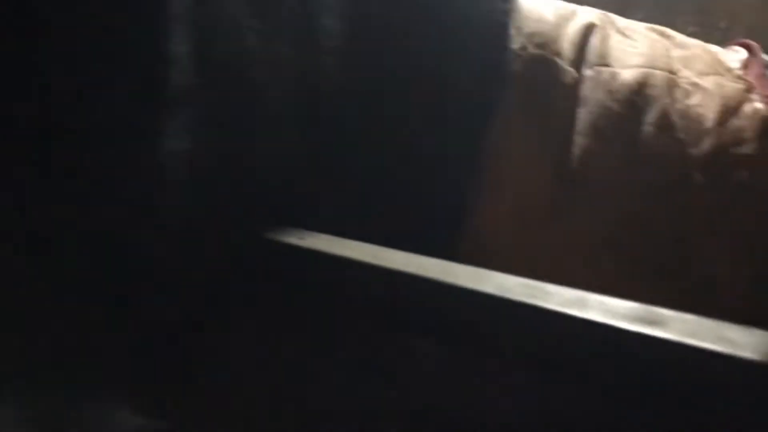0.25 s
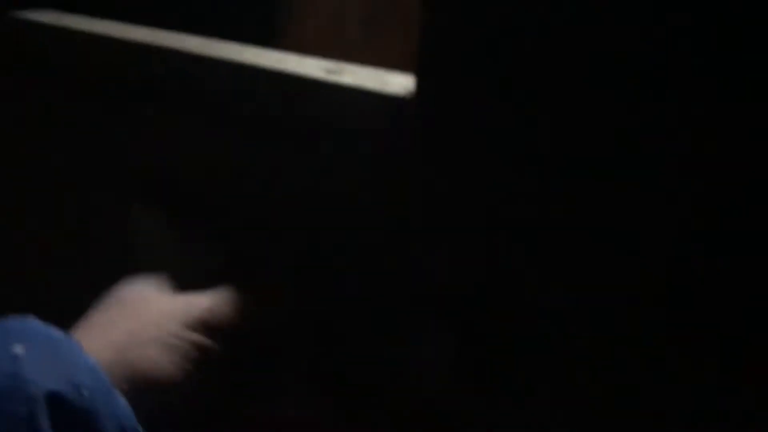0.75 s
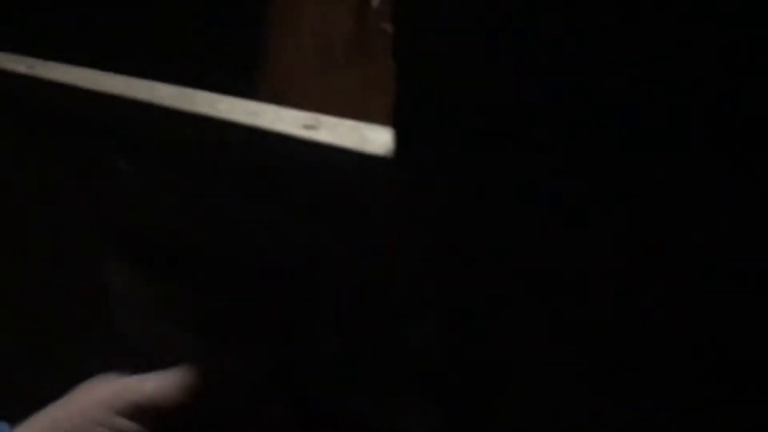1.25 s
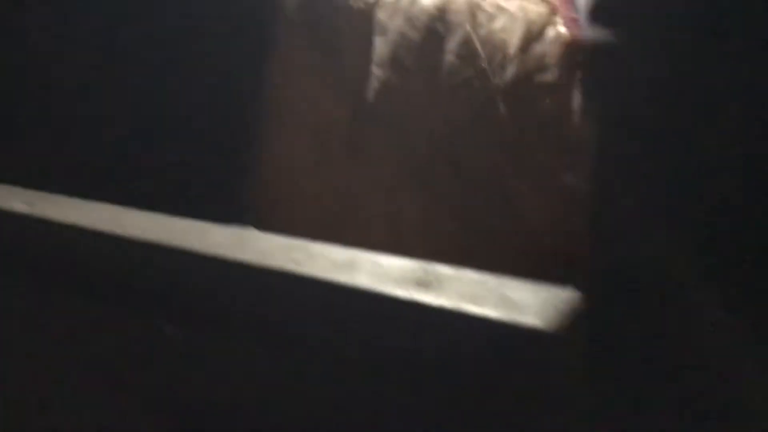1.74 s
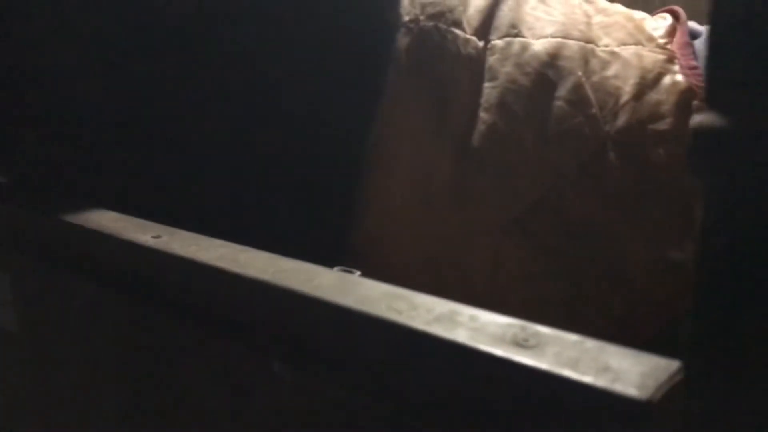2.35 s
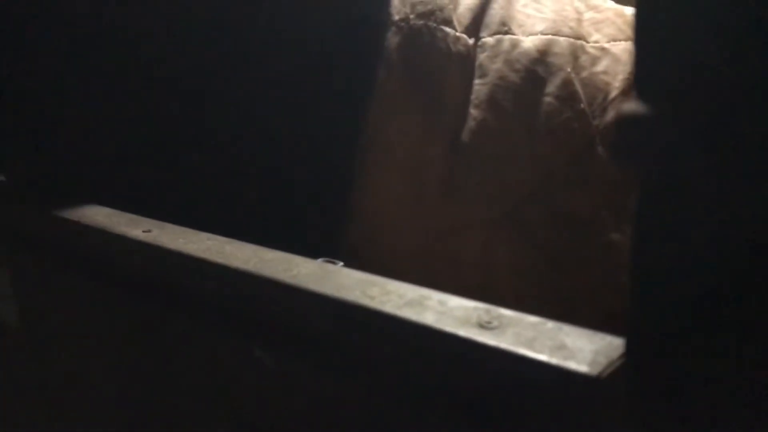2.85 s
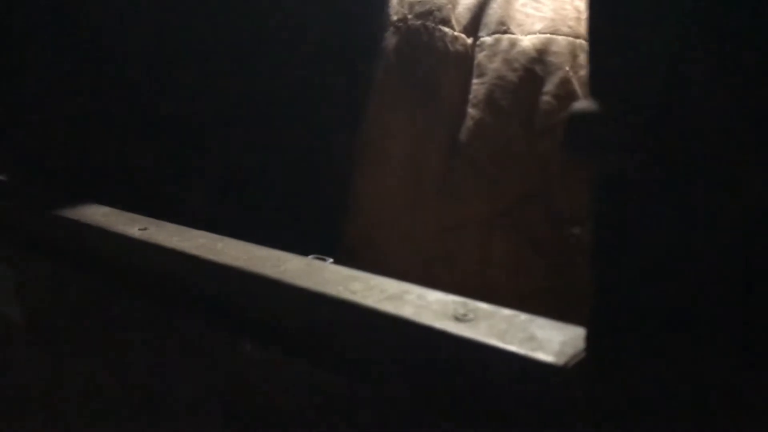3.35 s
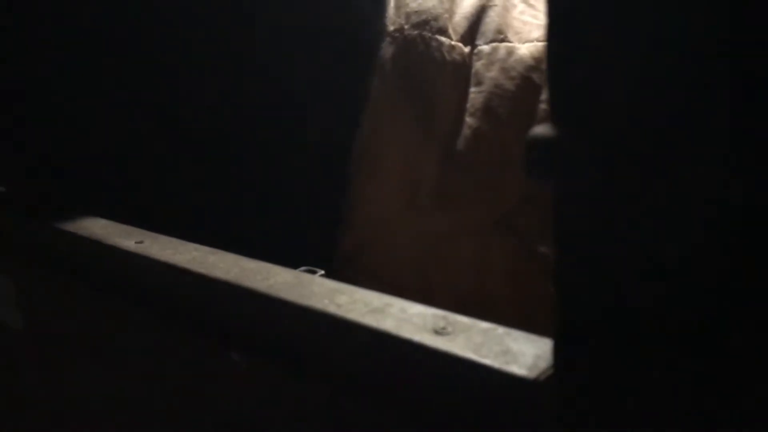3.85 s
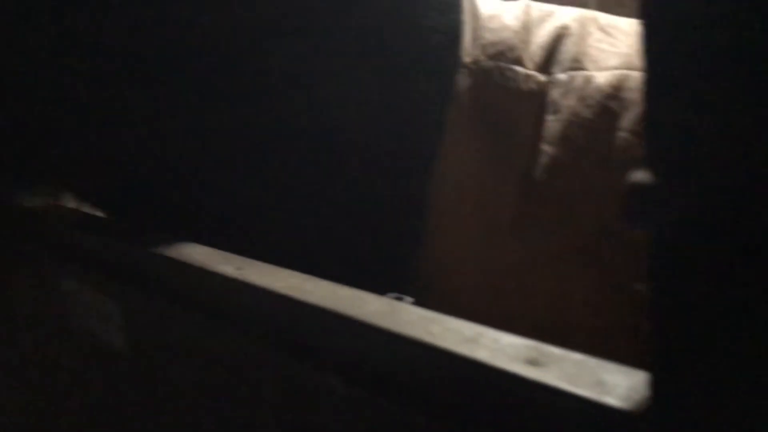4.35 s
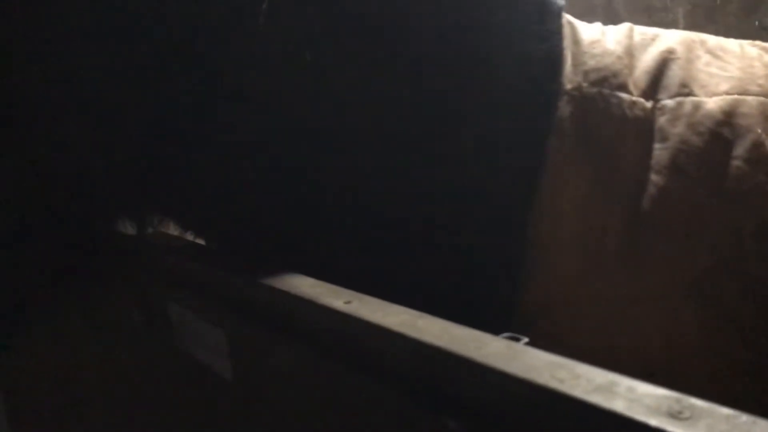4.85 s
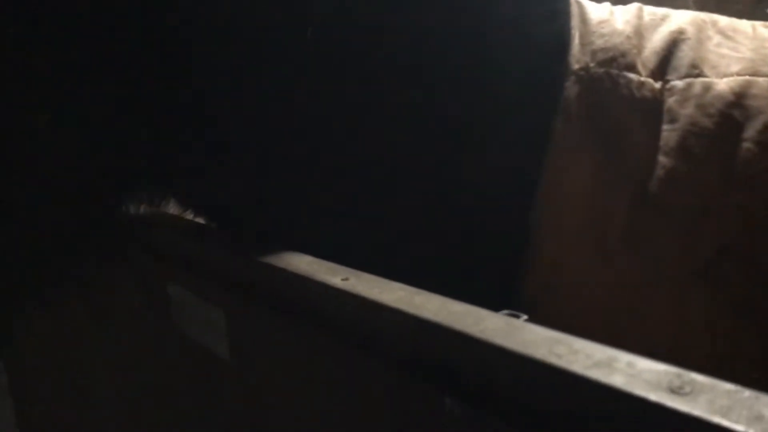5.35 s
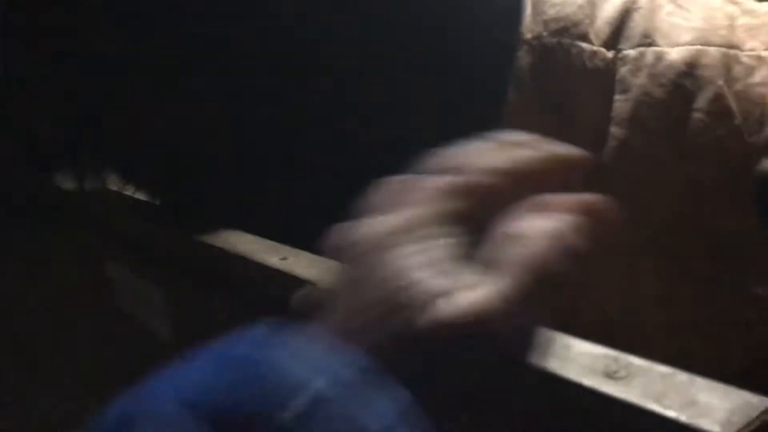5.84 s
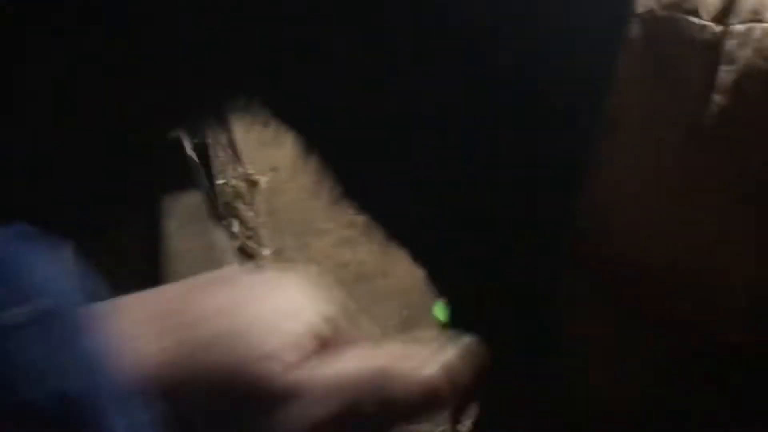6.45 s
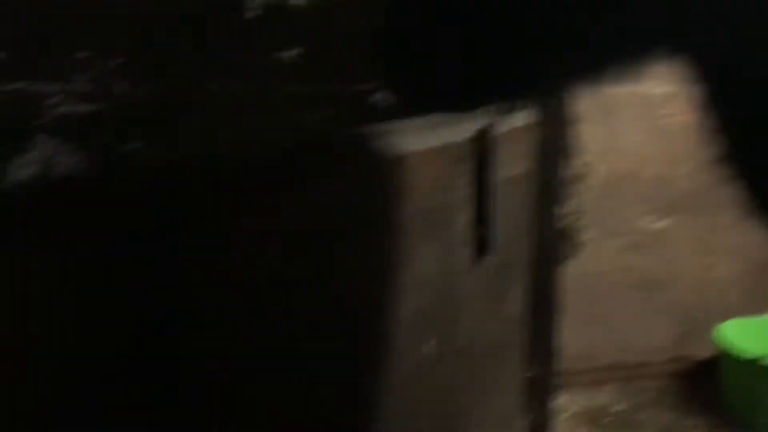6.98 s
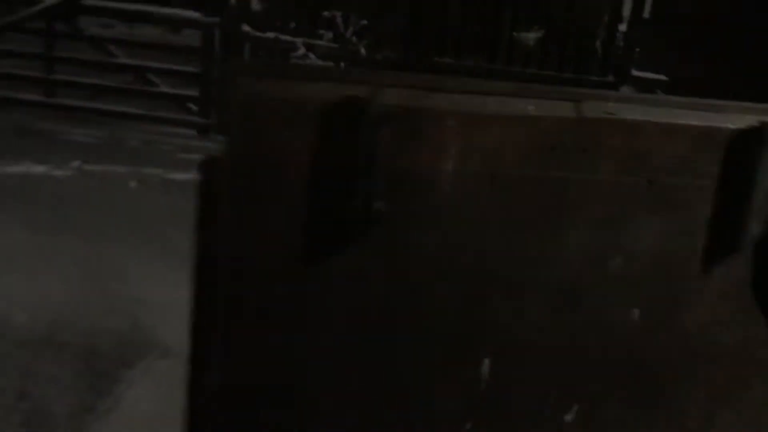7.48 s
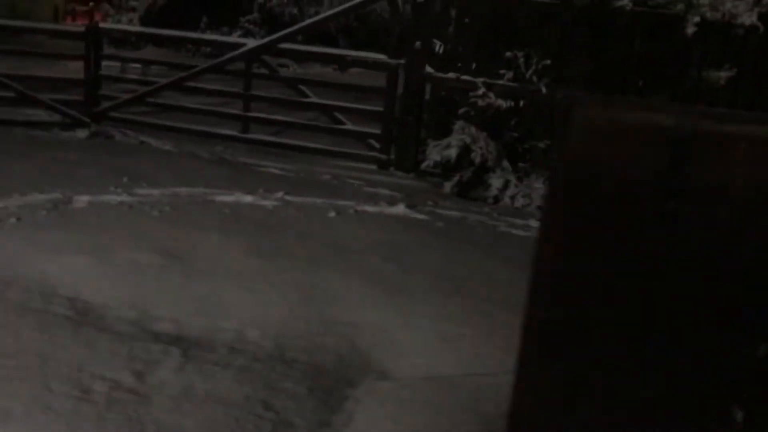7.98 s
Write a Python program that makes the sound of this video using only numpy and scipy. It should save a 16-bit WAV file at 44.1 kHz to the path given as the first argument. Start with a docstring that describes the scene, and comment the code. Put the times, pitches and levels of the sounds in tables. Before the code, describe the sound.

A steel bolt on a wooden stable half-door clacks, chatters and pings close up, boards booming behind, then scrapes and rustles as things quieten.

```python
"""The steel bolt of a wooden stable half-door, worked by hand close to a phone: it clacks, chatters and pings.
Each knock rings a bank of decaying steel modes with a crack and a rattle; the boards boom behind it as lower modes.
Shoves on the door feed grains into the boards for a judder and a deep thrum; the phone takes two soft bumps.
Filtered grit scrapes and rustles like steel, cloth and shoes; a short brick tail and a faint night hush
surround it all."""
import sys
import numpy as np
from scipy import signal
from scipy.fft import rfft, irfft
from scipy.io import wavfile
from scipy.ndimage import uniform_filter1d

SR = 44100
rng = np.random.default_rng(int(sys.argv[2]) if len(sys.argv) > 2 else 0)


def digitize_waveform(pressure):
    """Quantize a signal to 16-bit integers and store it at the path in sys.argv[1].

    Rows of a 2-D input are taken as channels; values are limited to [-1, 1].
    """
    field = np.atleast_2d(pressure).T
    bounded = np.clip(field, -1, 1)
    quanta = np.round(bounded * 32767).astype(np.int16)
    wavfile.write(sys.argv[1], SR, quanta)


N = 362254  # length in samples


def undb(db):
    """Gain of a dB value."""
    return 10 ** (np.asarray(db) / 20)


def fade(t, t60):
    """Amplitude that falls 60 dB in t60 seconds."""
    return np.exp(-np.log(1000) * t / t60)


def band(x, lo_hz, hi_hz):
    """Band-pass."""
    return signal.sosfilt(signal.butter(3, [lo_hz, hi_hz], "band", fs=SR, output="sos"), x)


def level(x, db):
    """Scale to an rms level."""
    return x * undb(db) / np.sqrt(np.mean(x ** 2))


def curves(table):
    """Columns of a table, after its times, as per-sample curves."""
    s, *columns = np.transpose(table)
    return [np.interp(np.arange(N) / SR, s, c) for c in columns]


def add(out, s, x):
    """Mix a sound in at time s."""
    i = int(s * SR)
    out[i:i + len(x)] += x[:N - i]


def walk(rate):
    """Random levels, slewed from one to the next at rate per second; spread near 1."""
    k = int(SR / rate)
    steps = np.repeat(rng.standard_normal(N // k + 1), k)
    return 1.2 * uniform_filter1d(steps, k)[:N]


def grit(rate, spread_db):
    """Tiny clicks of very uneven size, rate per second on average."""
    clicks = rng.random(N) < rate / SR
    return clicks * rng.standard_normal(N) * undb(spread_db * rng.exponential(size=N))


def ring(modes, push):
    """A force signal rings a table of modes."""
    t = np.arange(SR) / SR
    response = sum(undb(db) * fade(t, t60) * np.sin(2 * np.pi * hz * t) for hz, db, t60 in modes)
    return signal.fftconvolve(push, response)[:N]


# spectrum of the night air: [f/Hz, relative level/dB per Hz]
HUSH_SPECTRUM = [(15, -32), (25, -10), (223, 6), (607, -5.5), (796, -5), (1940, -14), (6050, -23),
                 (10400, -27.5), (14800, -28), (16000, -31.5)]
HUSH_DB = -64  # overall rms


def hush():
    """Faint steady air and microphone noise: white noise shaped by a spectrum."""
    hz, db = np.transpose(HUSH_SPECTRUM)
    f = np.arange(1, N // 2 + 2) * SR / N
    shape = undb(np.interp(np.log(f), np.log(hz), db))
    return level(irfft(rfft(rng.standard_normal(N)) * shape, N), HUSH_DB)


# bed of rubbing between knocks: [t/s, scrape level/dB, rustle level/dB]
RUB_BED = [(0.0, -48, -76), (0.16, -66, -68), (0.8, -55, -71.5), (1.05, -68, -70.5), (1.69, -59, -62),
           (2.45, -73.5, -77), (3.41, -69.5, -76.5), (4.25, -68.5, -70.5), (4.5, -64, -84.5),
           (4.71, -82.5, -76.5), (5.28, -74.5, -76.5), (5.44, -55.5, -67), (6.17, -65, -67.5),
           (7.13, -60, -76), (7.39, -66.5, -74.5), (8.21, -66, -75.5)]
# short drags and swishes on top: [t/s, length/s, scrape level/dB, rustle level/dB]
SWISHES = [(0.484, 0.23, -69, -96), (1.201, 0.12, -65.5, -73), (1.38, 0.3, -69, -79),
           (2.021, 0.15, -64, -80), (2.145, 0.026, -72, -61), (2.565, 0.26, -62.5, -67.5),
           (3.196, 0.11, -42.5, -56.5), (4.29, 0.068, -58.5, -63), (4.375, 0.059, -46.5, -66),
           (4.534, 0.088, -58.5, -88), (5.233, 0.29, -48, -62.5), (5.821, 0.17, -61.5, -74.5),
           (6.034, 0.19, -55, -75), (6.284, 0.031, -72.5, -74), (6.405, 0.15, -68.5, -92),
           (6.683, 0.077, -57.5, -57.5), (6.893, 0.018, -74, -79), (7.077, 0.086, -49.5, -56),
           (7.633, 0.12, -60, -64), (7.722, 0.11, -56, -75), (8.103, 0.18, -47, -51.5)]


def rubbing():
    """Steel scrapes in its guides as grit rings the bolt; cloth and shoes rustle in fine grains."""
    scrape_gain, rustle_gain = (undb(c) for c in curves(RUB_BED))
    t = np.arange(SR // 2) / SR
    for s, length, scrape_db, rustle_db in SWISHES:
        # quick rise, a plateau, then a tail that lingers longer in the rustle
        rise = np.clip(t / (0.18 * length), 0, 1)
        late = np.clip(t - .6 * length, 0, None)
        add(scrape_gain, s, undb(scrape_db) * rise * fade(late, 0.091))
        add(rustle_gain, s, undb(rustle_db) * rise * fade(late, 0.28))
    low, high, fine = grit(6000, 1.7), grit(9000, 1.7), grit(14000, 1.8)
    dull = level(band(low, 350, 1600), -5) + level(ring(BOLT_MODES[:5], low), -10)
    dull *= undb(1.5 * walk(30))
    keen = level(band(high, 1400, 5000), -5.5) + level(ring(BOLT_MODES[5:10], high), -20.5)
    keen *= undb(0.48 * walk(30))
    rustle = level(band(fine, 4900, .45 * SR), 0) * undb(1.3 * walk(40))
    ticks = level(band(grit(150, 0.74), 700, 2600), -8.5)  # sparser grains that catch
    return (dull + keen + ticks) * scrape_gain + rustle * rustle_gain


# the hand pushes or shakes the door: [t/s, hold/s, deep thrum level/dB, boards level/dB]
SHOVES = [(0.001, 0.023, -51, -49.5), (.29, .06, -49.5, -58), (.42, 0.033, -46, -44.5),
          (0.619, 0.14, -39.5, -42.5), (0.818, .08, -52, -42), (0.937, 0.015, -55, -53),
          (1.66, .3, -62.5, -52), (2.266, 0.025, -43, -48), (2.627, 0.1, -58, -44),
          (2.973, 0.036, -42.5, -40.5), (3.203, 0.032, -50, -42.5), (3.433, .15, -51, -50.5),
          (3.795, 0.048, -42.5, -44), (4.369, .04, -56, -32.5), (4.5, .12, -48, -68),
          (5.28, 0.22, -50.5, -52), (5.916, 0.062, -57, -51), (6.342, 0.18, -38, -44),
          (6.558, 0.039, -36, -47.5), (6.723, .05, -53, -63), (6.888, .02, -53.5, -48.5),
          (7.065, 0.021, -71, -49.5)]
PUSH_S, REST_DB = .04, -70.5  # rise of a push, door at rest
DEEP_T60_S, JUDDER_T60_S = 0.68, .45  # how thrum and boards settle


def pushes():
    """Gains of thrum and boards: each push rises, holds and settles."""
    t, gains = np.arange(SR) / SR, np.full((2, N), undb(REST_DB))
    for s, hold, deep_db, boards_db in SHOVES:
        rise = np.clip(t / PUSH_S, 0, 1) ** 2
        late = np.clip(t - PUSH_S - hold, 0, None)
        add(gains[0], s, undb(deep_db) * rise * fade(late, DEEP_T60_S))
        add(gains[1], s, undb(boards_db) * rise * fade(late, JUDDER_T60_S))
    return gains


def judder():
    """Grains of force shake the boards under the hand; the lowest mode and low noise make the thrum."""
    deep_gain, boards_gain = pushes()
    shake = band(grit(380, 3.4), 40, 480)
    # a hand on the door damps the boards
    held = [(hz, db, 0.23 * t60) for hz, db, t60 in BOARD_MODES]
    boards = level(ring(held[1:], shake), 0) * undb(0.58 * walk(21))
    rumble = level(band(rng.standard_normal(N), 45, 100), -6.5)
    thrum = rumble + level(ring(held[:1], shake), -4.8)
    return boards * boards_gain + thrum * deep_gain


# bolt knocks: [t/s, steel level/dB, steel top edge level/dB, boom of the boards level/dB]
KNOCKS = [(0.0387, -7.5, -40.5, -47.5), (0.1536, -39, -47, -66), (0.3114, -13.5, -54.5, -48.5),
          (0.3885, -49, -65, -48), (0.4442, -26.5, -75, -43), (0.622, -35.5, -40.5, -63),
          (0.6821, -30.5, -83, -41), (0.7585, -4.5, -52, -52.5), (0.7834, -32, -50, -35.5),
          (0.8766, -4, -31, -45.5), (1.2065, -35.5, -45, -91), (1.3503, -32.5, -90, -96),
          (1.6775, -7.5, -20.5, -42.5), (1.7732, -11.5, -51, -52), (1.7833, -14, -29.5, -41),
          (2.2545, -31, -63, -57.5), (2.2971, -39.5, -77, -51.5), (2.4418, -40.5, -73, -70),
          (2.605, 1, -32, -44.5), (2.6774, -12.5, -47, -50), (2.6835, -2.5, -29.5, -37.5),
          (2.699, -16.5, -32.5, -35), (2.9772, -28.5, -43, -56.5), (2.9946, -15.5, -73.5, -38),
          (3.068, -44.5, -54.5, -70), (3.183, -38, -67.5, -49), (3.1992, -15, -52, -38),
          (3.2296, -8, -45.5, -36), (3.262, -21, -83, -39), (3.2877, -24, -88, -39),
          (3.309, -32, -56.5, -45), (3.323, -33, -67, -46), (3.434, -20, -62, -37),
          (3.5575, -41.5, -54.5, -80), (3.5754, -34, -68.5, -58.5), (3.5803, 2, -38.5, -55.5),
          (3.8194, -26.5, -75, -44), (3.8428, -2, -39.5, -44.5), (4.3295, -30.5, -42, -40),
          (4.408, -21.5, -45, -35), (4.4222, -27.5, -71, -29), (4.5112, -7, -40.5, -56),
          (4.6794, -33, -50.5, -63.5), (5.2724, -10, -28.5, -40.5), (5.367, -33.5, -66.5, -67),
          (5.3869, -11.5, -39, -41.5), (5.4058, -8, -32.5, -38.5), (5.4154, 4, -11.5, -27),
          (5.6396, -31.5, -60, -60), (5.6634, -33.5, -42, -59.5), (6.0251, -24.5, -53.5, -47),
          (6.3094, -34.5, -73, -68.5), (7.557, -40, -76.5, -88), (7.903, -46.5, -81, -66)]
# the bolt held in its guides: [f/Hz, relative level/dB, t60/s]
BOLT_MODES = [(675.7, -5, 0.038), (958, -3.5, 0.05), (1034, -2.5, 0.064), (1245.4, 3, 0.023),
              (1410, -2, 0.026), (1876, -3, 0.033), (2133, -5.5, .02), (2837, -2, 0.026),
              (3867, 0.5, 0.024), (4540, -14.5, 0.0083), (5580, 5, 0.011), (5870, -6.5, 0.019),
              (6200, -2, 0.012), (7590, -11, 0.045), (8450, -10, 0.043), (9790, -1, .03),
              (12030, 7.5, 0.014), (14000, -6, 0.014), (14400, -3.5, 0.0092)]
# centres of clank, steel, bright band and top edge: [f/Hz]
COLOUR_HZ = [1100, 3000, 5600, 11000]
# low clank, grows with steel and boards: [level/dB, slope on steel/dB per dB, slope on boards/dB per dB]
CLANK = (12.76, .38, 0.53)
# bright band, grows with steel and top edge: [level/dB, slope on steel/dB per dB, slope on top edge/dB per dB]
BRIGHT = (5.1, .75, 0.43)
CLANK_TOP_DB, BRIGHT_TOP_DB = -12, -6  # neither gets louder than this
CHATTER_S, CHATTER_DB_PER_DB = 0.0021, 0.14  # decay at a 0 dB blow; weaker blows chatter longer


def bolt():
    """Each knock rings the bolt through a short chatter of rebounds, with a dry crack and a duller after-rattle."""
    out, cracks, t = np.zeros(N), np.zeros(N), np.arange(6000) / SR
    hz, mode_db, t60 = np.transpose(BOLT_MODES)[:, :, None]
    f = np.arange(1, len(t) // 2 + 2) * SR / len(t)
    for s, steel_db, top_db, boards_db in KNOCKS:
        clank_db = min(np.dot(CLANK, [1, steel_db, boards_db]), CLANK_TOP_DB)
        bright_db = min(np.dot(BRIGHT, [1, steel_db, top_db]), BRIGHT_TOP_DB)
        colour = np.array([clank_db, steel_db, bright_db, top_db])
        # every blow lands elsewhere, so the balance of modes changes; weak ones hardly ring
        luck = rng.standard_normal((2, len(BOLT_MODES), 1))
        mode_colour = np.interp(np.log(hz), np.log(COLOUR_HZ), colour)
        gain = undb(mode_db + mode_colour + 2.4 * luck[0] - 11 + 0.11 * steel_db)
        swell = np.clip(t * hz / 1.7, 0, 1)  # a mode needs a cycle or so to build up
        waves = np.sin(2 * np.pi * hz * np.exp(0.018 * luck[1]) * t)
        tone = np.sum(gain * swell * fade(t, t60) * waves, axis=0)

        chatter = CHATTER_S * undb(-CHATTER_DB_PER_DB * steel_db)
        die = np.exp(-t / np.clip(chatter, .0005, .05))
        hits = rng.random(len(t)) < 2200 / SR
        rebounds = .7 * die * hits * rng.uniform(-1.1, 1, len(t))
        rebounds[0] = 1  # the blow itself
        ringing = signal.fftconvolve(tone, rebounds)[:len(t)]

        shape = undb(np.interp(np.log(f), np.log(COLOUR_HZ), colour)) / (1 + (600 / f) ** 3)
        hiss = rfft(rng.standard_normal((2, len(t)))) * shape
        crack = irfft(hiss[0], len(t)) * die
        rattle_fade = np.clip(t / 0.0038, 0, 1) * (fade(t, 0.073) + 0.065 * fade(t, 0.29))
        rattle = irfft(hiss[1] / (1 + f / 2500), len(t)) * rattle_fade
        soft = np.clip(t / (.0003 * undb(-.7 * steel_db)), 0, 1)  # weak blows press longer
        add(out, s, soft * (ringing + undb(1.5) * crack) + undb(-11.5) * rattle)
        add(cracks, s, soft * crack)
    return out, cracks


# door boards, free to ring: [f/Hz, relative level/dB, t60/s]
BOARD_MODES = [(64.8, -10, 0.99), (135, -2.5, 0.38), (175.5, -3.5, 0.33), (212.4, -1, 0.37),
               (273.5, -9, 0.3), (349.1, -1.5, 0.22), (381, -12.5, 0.022), (549, -3, 0.04),
               (653, -1, 0.023)]


def boom():
    """Each knock reaches the boards as a smeared blow and rings their modes."""
    out, t = np.zeros(N), np.arange(SR // 2) / SR
    hz, mode_db, t60 = np.transpose(BOARD_MODES)[:, :, None]
    for s, *_, boards_db in KNOCKS:
        luck = rng.standard_normal((2, len(BOARD_MODES), 1))
        waves = np.sin(2 * np.pi * hz * np.exp(0.024 * luck[1]) * t)
        tone = np.sum(undb(mode_db + 2.8 * luck[0]) * fade(t, t60) * waves, axis=0)
        # the blow is smeared over some milliseconds
        blow = band(rng.standard_normal(1200) * np.exp(-t[:1200] / 0.0081), 250, 1000)
        thud = signal.fftconvolve(tone, blow)
        add(out, s, undb(boards_db) * thud / np.std(thud[:1300]))
    return out


# stable echo by band: [f/Hz, starting level/dB, t60/s]
TAIL = [(333, -40, 0.32), (1050, -46, 0.31), (2460, -62.5, 0.42), (5400, -68, 0.58), (11000, -56, .2)]


def stable(x):
    """Diffuse echo of the brick walls: bands of noise, each dying at its own rate."""
    t = np.arange(SR // 2) / SR
    tail = np.zeros(len(t))
    for hz, db, t60 in TAIL:
        noise = band(rng.standard_normal(len(t)), hz / 1.6, hz * 1.695)
        tail += level(noise, db) * fade(t, t60)
    return signal.fftconvolve(x, tail * np.clip(t / 0.0083, 0, 1))[:N]


# faint squeaks of steel on steel: [t/s, length/s, f/Hz, level/dB, third partial level/dB]
SQUEAKS = [(1.34, 0.025, 2080, -56, -56), (1.421, 0.028, 2080, -60, -59), (1.524, 0.024, 2090, -57, -54.5),
           (5.767, 0.39, 1267, -61, -82), (6.414, 0.087, 1065, -58, -83)]


def squeaks():
    """Steel rubs on steel: a jittering tone and its third partial swell and fade."""
    out = np.zeros(N)
    for s, length, hz, db, third_db in SQUEAKS:
        n = int(length * SR)
        jitter = level(band(rng.standard_normal(n), 20, 200), 0)
        phase = 2 * np.pi * np.cumsum(hz * np.exp(.01 * jitter)) / SR
        add(out, s, np.hanning(n) * (undb(db) * np.sin(phase) + undb(third_db) * np.sin(3 * phase)))
    return out


# notes of loose steel parts: [f/Hz]
LOOSE_HZ = [1520, 2440, 5696, 6550, 7122, 7660, 8500, 8800, 10350, 15545]
# how long each note rings: [t60/s]
LOOSE_T60_S = [.14, .36, .24, .04, .1, .09, .05, .03, .08, .13]
# when each note is left ringing, one list a note: [t/s, level/dB]
PINGS = [
    [(3.438, -44.5)],
    [(2.258, -51.5)],
    [(1.784, -60), (5.416, -34)],
    [(2.979, -45)],
    [(5.416, -32.5)],
    [(2.685, -32), (3.845, -43)],
    [(3.198, -42), (4.511, -48), (5.299, -44.5)],
    [(5.664, -41)],
    [(1.678, -46.5), (5.414, -29.5)],
    [(2.684, -50.5), (5.414, -43.5)],
]


def pings():
    """Single decaying steel notes that waver as loose parts touch."""
    out, t = np.zeros(N), np.arange(SR // 2) / SR
    for hz, t60, hits in zip(LOOSE_HZ, LOOSE_T60_S, PINGS):
        for s, db in hits:
            waver = 1 + level(band(rng.standard_normal(len(t)), 15, 60), -11)
            add(out, s, undb(db) * fade(t, t60) * waver * np.sin(2 * np.pi * hz * t))
    return out


# soft bumps on the phone: [t/s, settled f/Hz, level/dB]
BUMPS = [(6.929, 63.2, -28.5), (6.982, 126, -50)]


def bumps():
    """The phone takes soft bumps: a short damped sine whose pitch drops as it lands."""
    out = np.zeros(N)
    for s, hz, db in BUMPS:
        t = np.arange(int(1.6 * SR / hz)) / SR
        wave = np.sin(2 * np.pi * hz * t - 3.7 * np.exp(-t * hz * 2.7))
        add(out, s, undb(db) * wave * np.exp(-t * hz * 0.69) * np.hanning(len(t)) ** 0.66)
    return out


def scene():
    """All sources in the stable; the walls give back mostly the dry crack of each blow."""
    steel, cracks = bolt()
    steel = steel + squeaks() + pings()
    echo = stable(cracks + undb(-8.5) * steel)
    door = boom() + judder() + bumps()
    return (steel + echo + door + rubbing() + hush())[None]


TOP_HZ = 15900


def record(dry):
    """The phone clips near full scale and cuts the top."""
    low_pass = signal.ellip(12, .2, 95, TOP_HZ, fs=SR, output="sos")
    return signal.sosfilt(low_pass, np.clip(dry, -.8, .8))


dry = scene()
out = record(dry)
digitize_waveform(out)
```